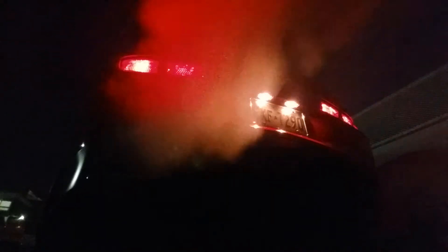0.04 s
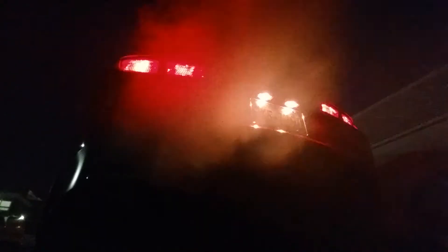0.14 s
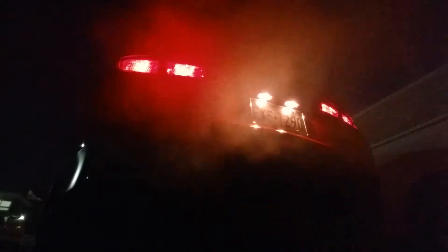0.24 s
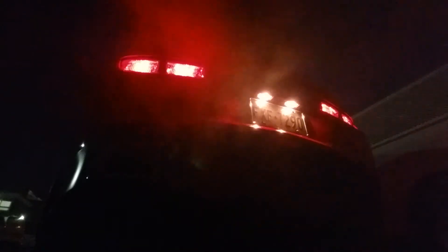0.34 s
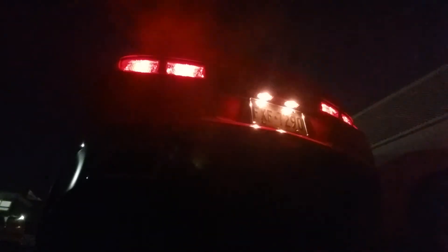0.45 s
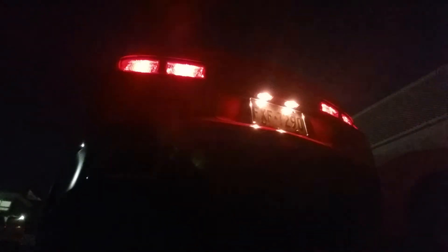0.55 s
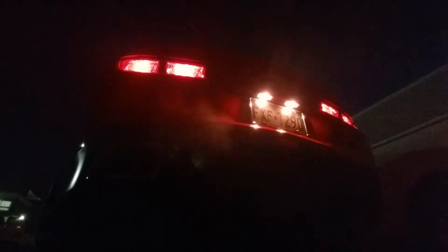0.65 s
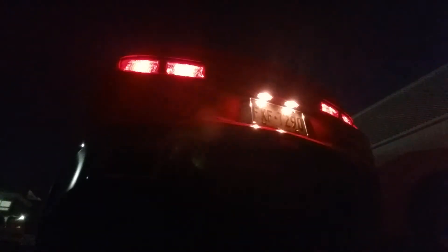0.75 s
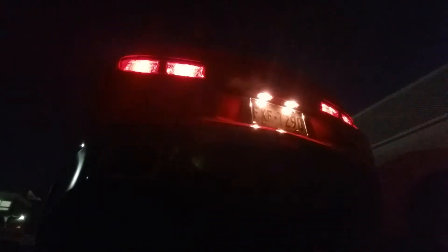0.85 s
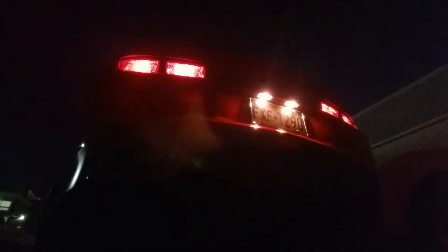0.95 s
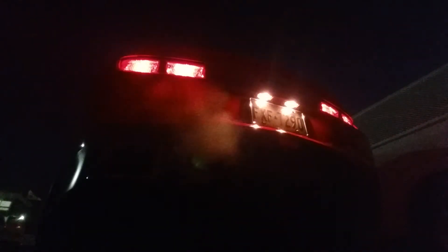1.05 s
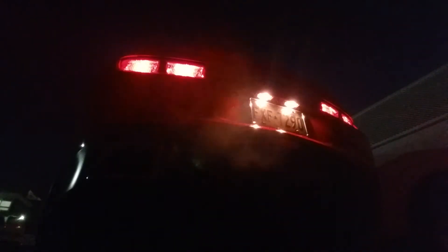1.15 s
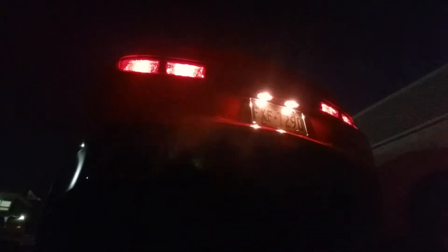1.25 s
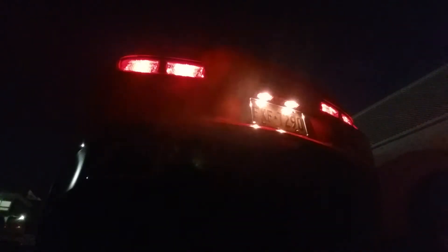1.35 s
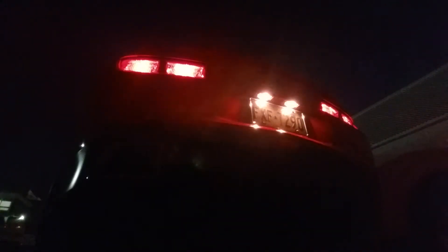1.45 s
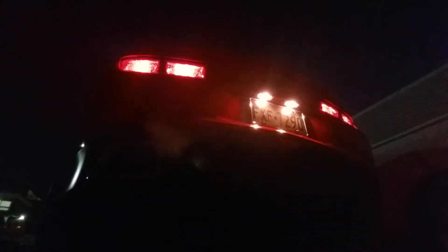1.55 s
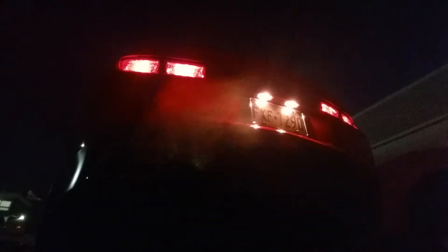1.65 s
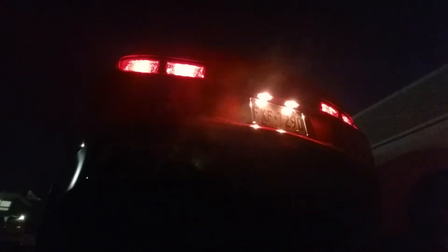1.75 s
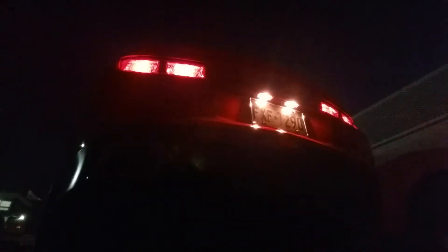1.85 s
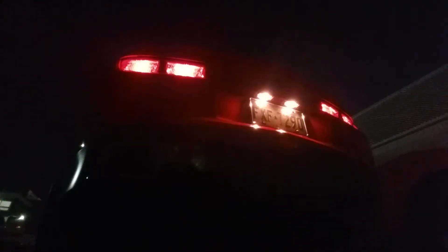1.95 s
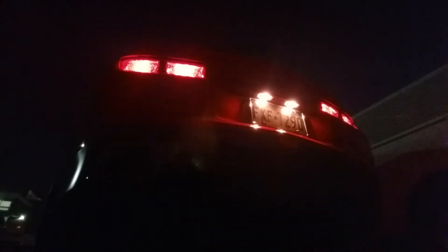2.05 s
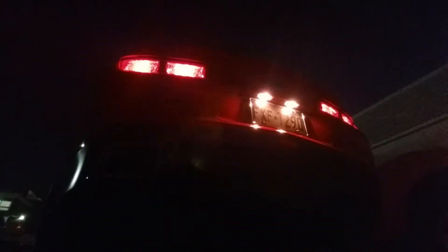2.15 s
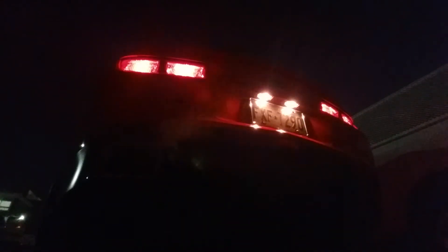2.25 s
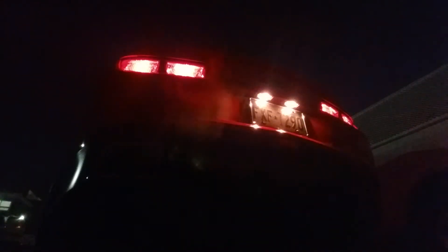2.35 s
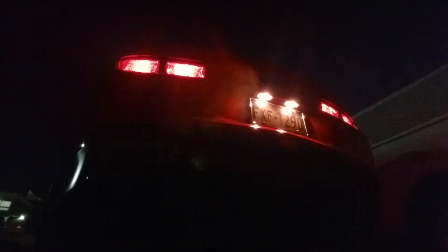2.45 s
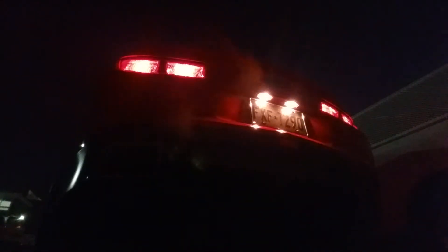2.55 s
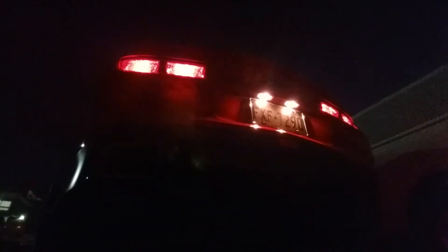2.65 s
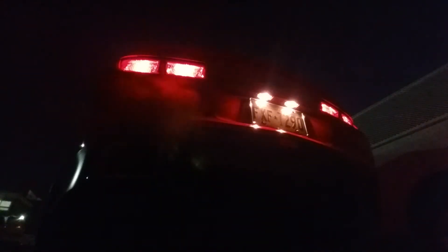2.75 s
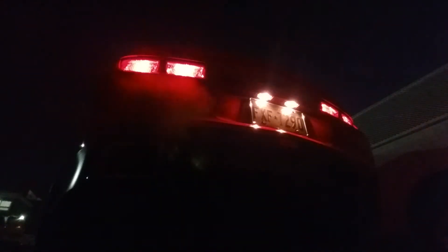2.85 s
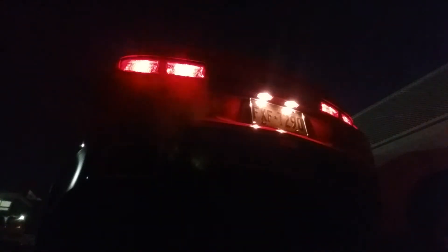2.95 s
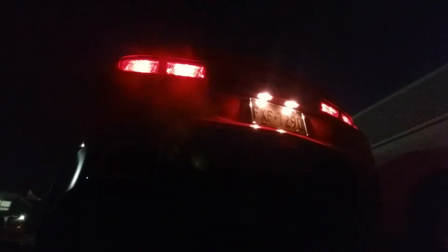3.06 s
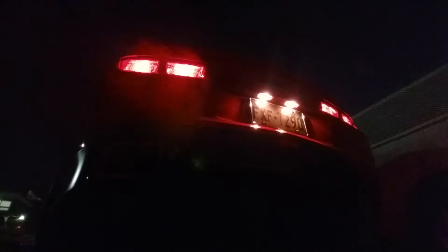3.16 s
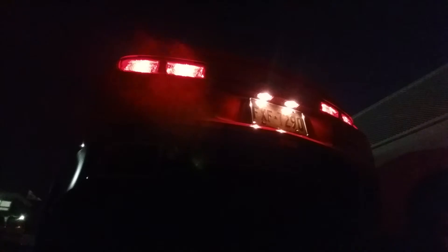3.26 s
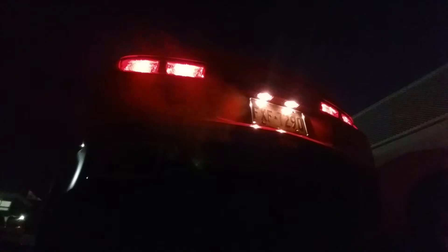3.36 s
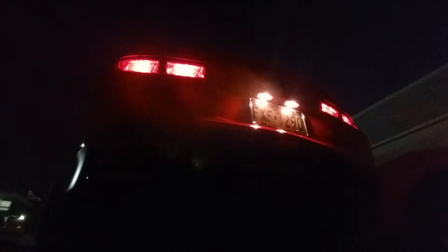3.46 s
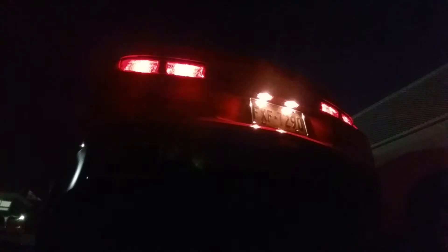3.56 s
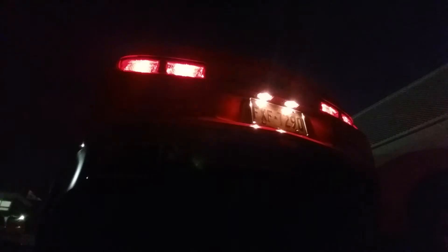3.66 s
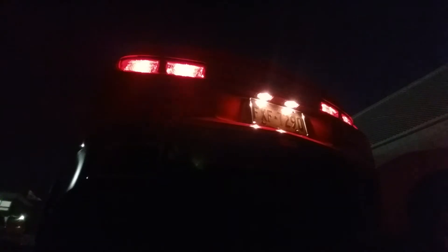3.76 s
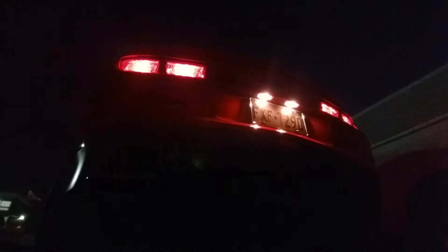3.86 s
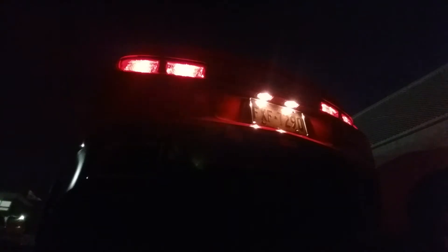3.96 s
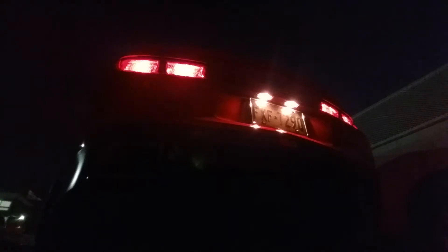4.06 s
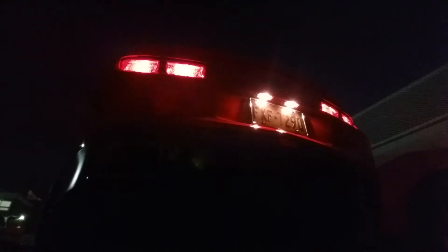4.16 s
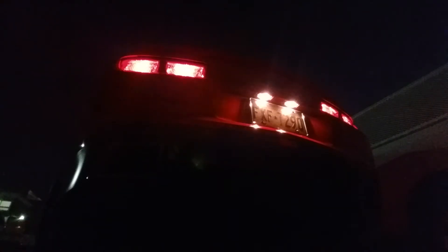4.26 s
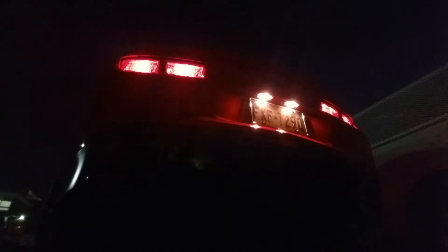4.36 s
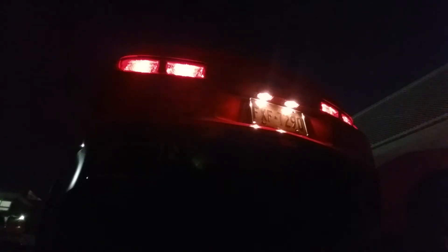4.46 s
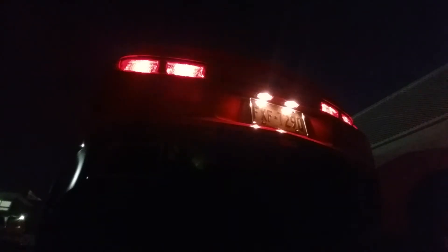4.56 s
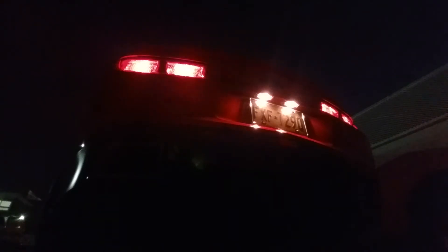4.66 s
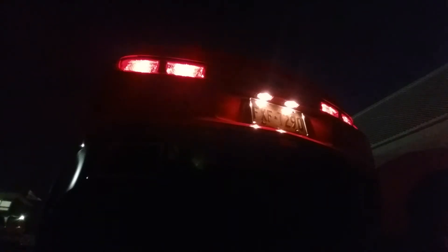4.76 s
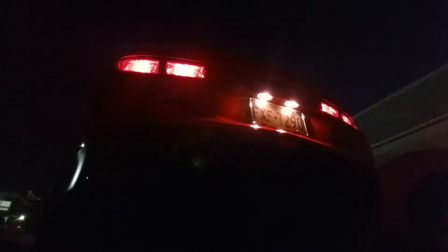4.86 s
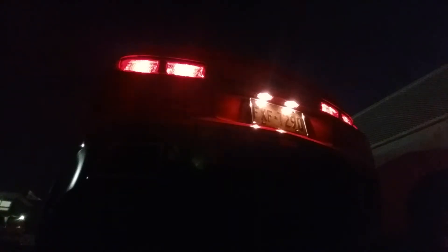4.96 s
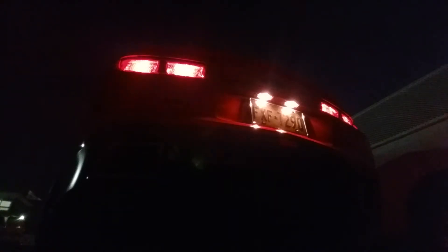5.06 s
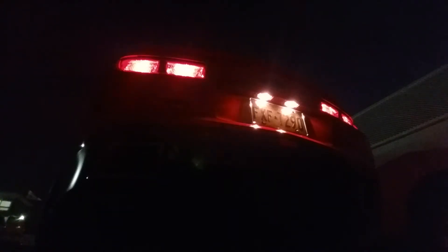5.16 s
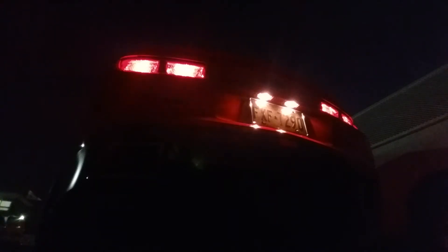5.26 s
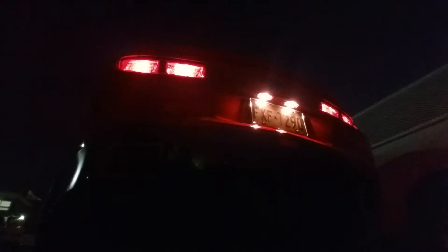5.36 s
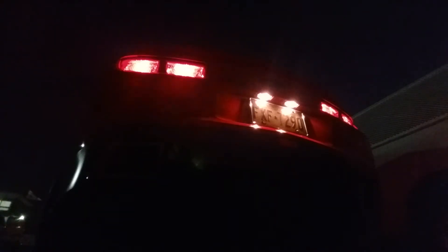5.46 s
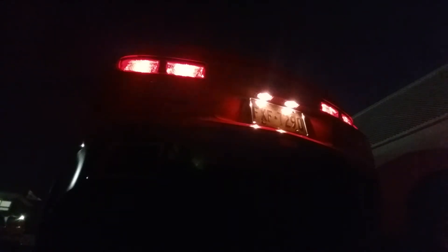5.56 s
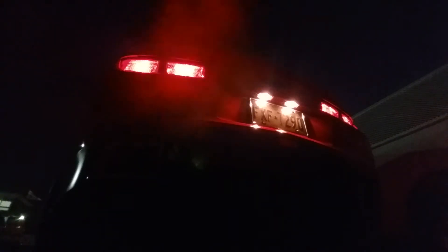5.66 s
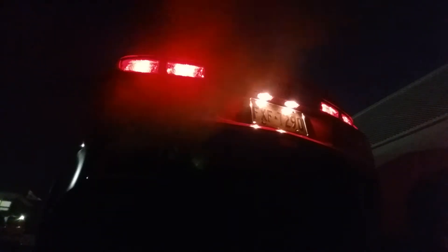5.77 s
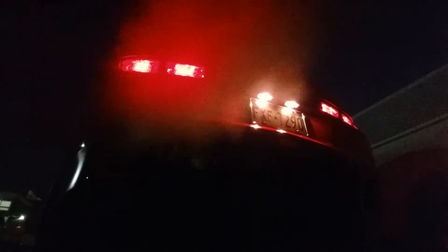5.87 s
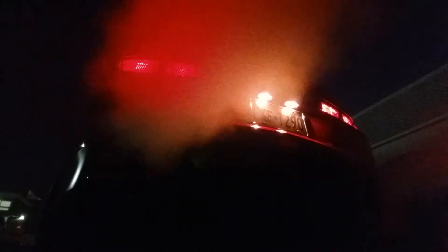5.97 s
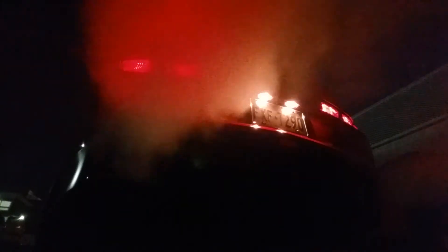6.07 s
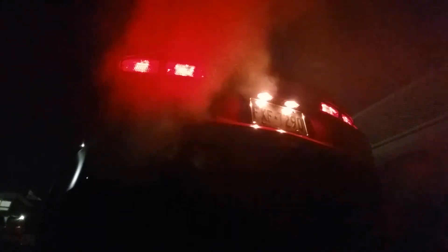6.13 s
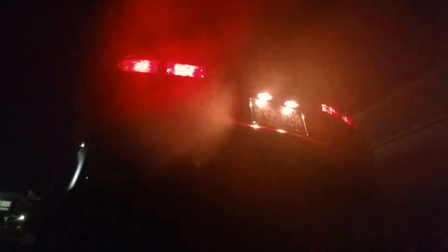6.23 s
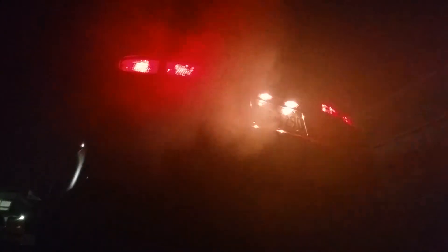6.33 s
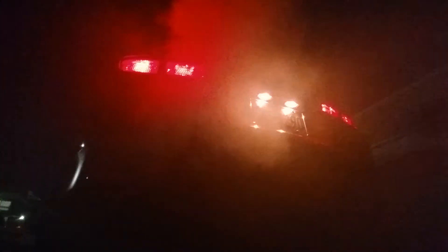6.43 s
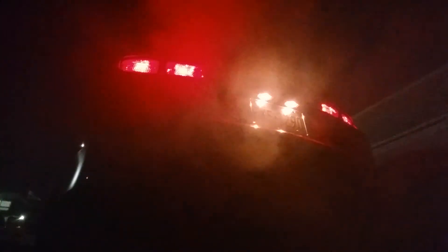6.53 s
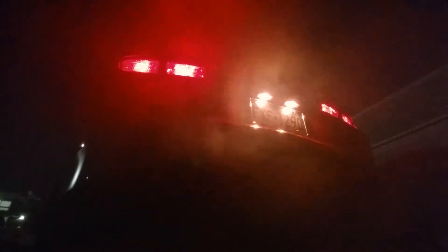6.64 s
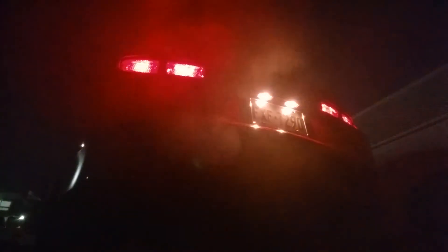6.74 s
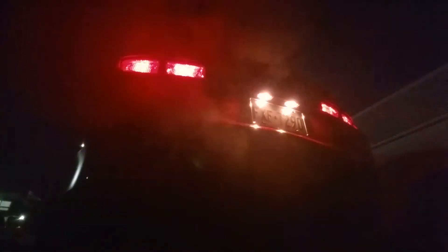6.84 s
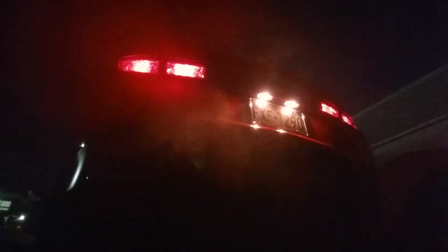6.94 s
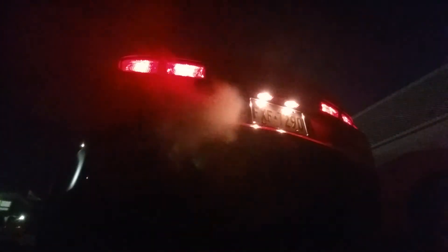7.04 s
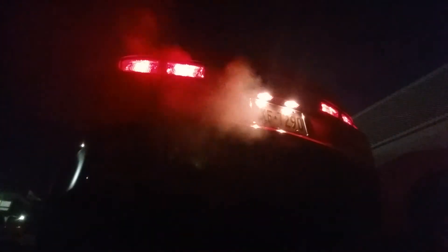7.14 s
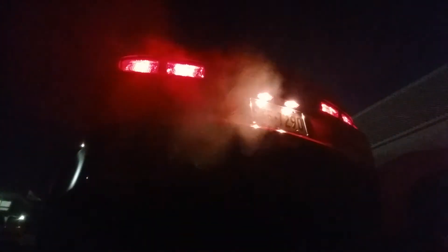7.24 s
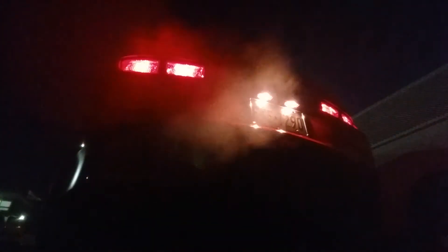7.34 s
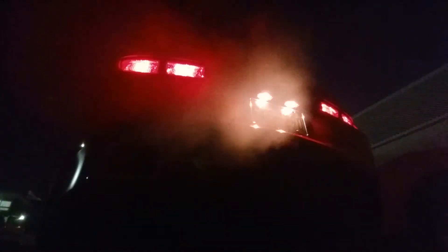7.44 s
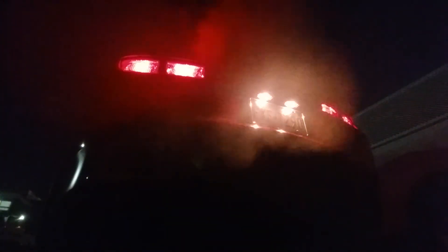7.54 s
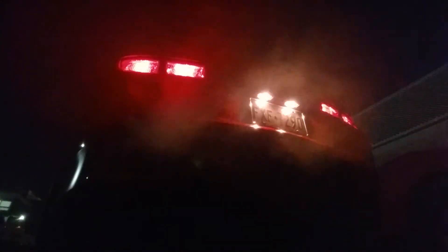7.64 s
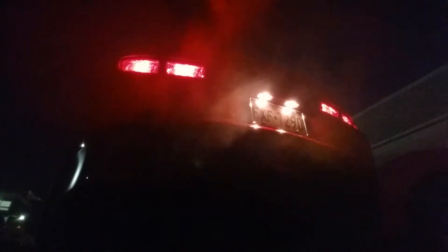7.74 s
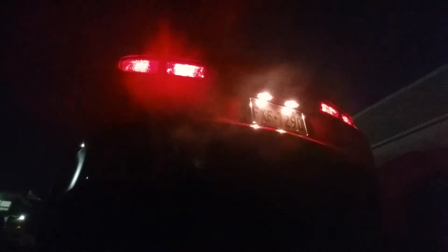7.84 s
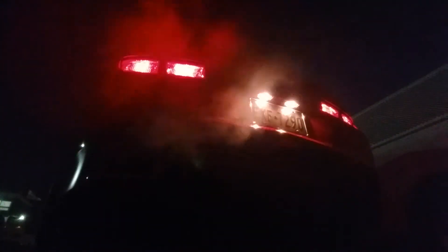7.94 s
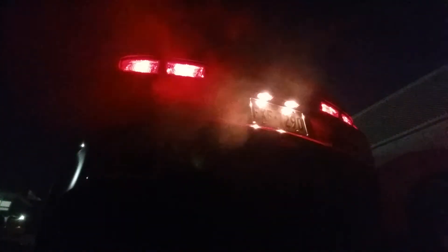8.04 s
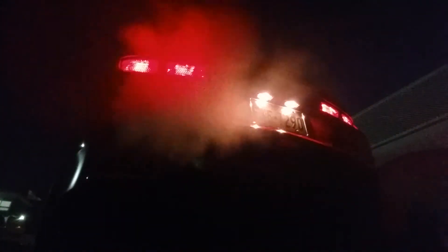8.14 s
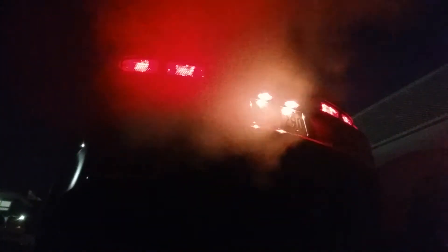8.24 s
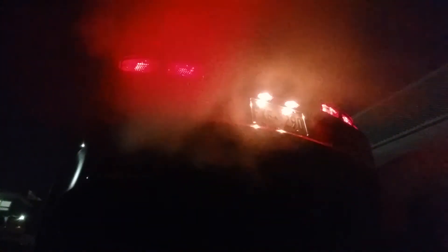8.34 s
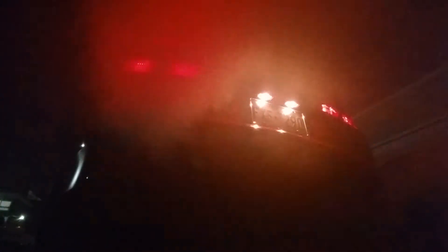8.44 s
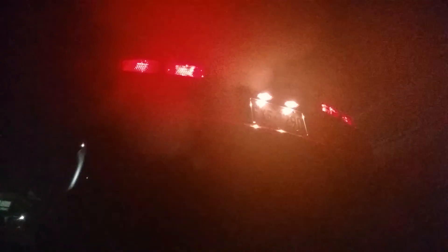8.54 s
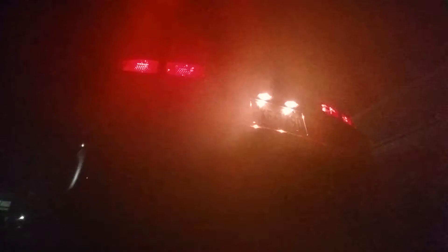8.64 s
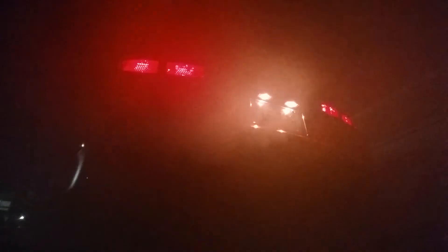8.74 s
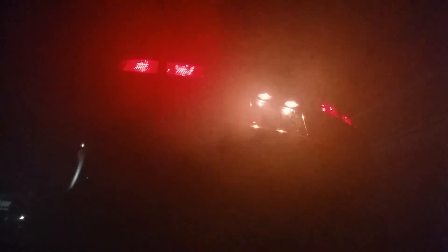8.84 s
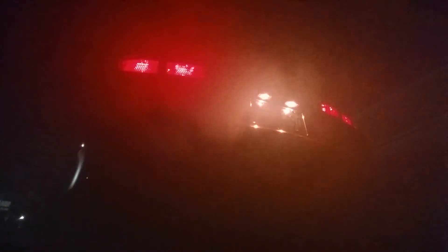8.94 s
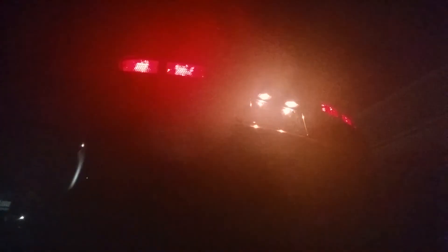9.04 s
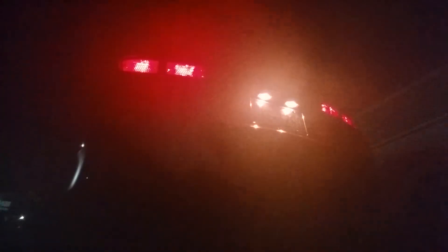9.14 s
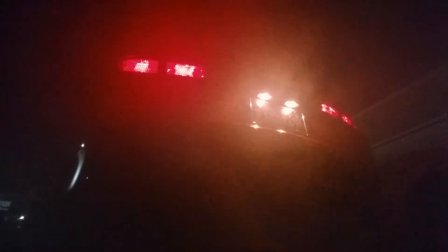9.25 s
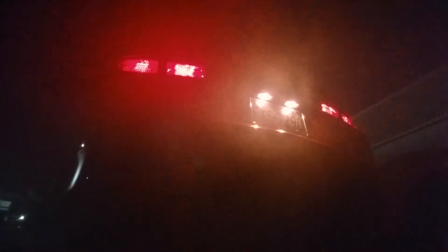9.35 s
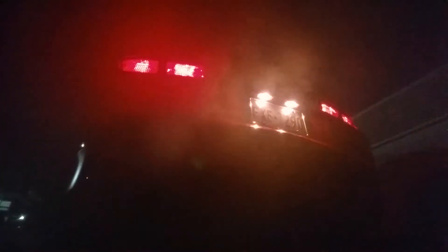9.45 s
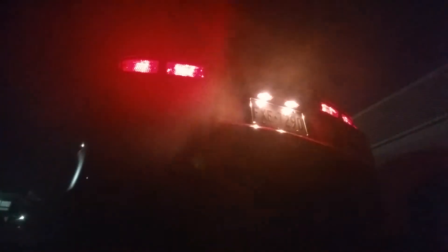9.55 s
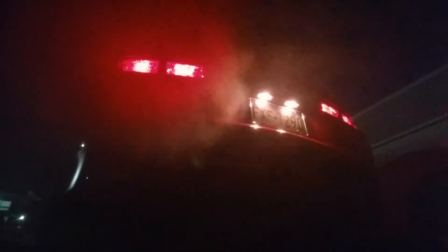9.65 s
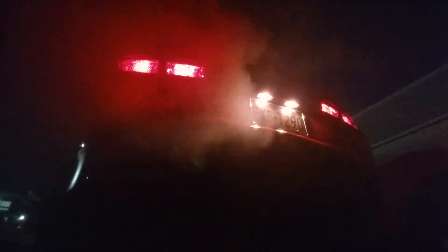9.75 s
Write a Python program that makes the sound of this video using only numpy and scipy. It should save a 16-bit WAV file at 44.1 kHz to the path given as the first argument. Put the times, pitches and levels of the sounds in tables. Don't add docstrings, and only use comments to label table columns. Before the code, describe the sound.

Close behind a car outdoors, a rasping exhaust roar falls into a deep loping idle before two more overloaded revs with crackling afterfire.

```python
import sys
import numpy as np
from scipy import signal
from scipy.io import wavfile
from scipy.ndimage import uniform_filter1d

SR = 44100
rng = np.random.default_rng(int(sys.argv[2]) if len(sys.argv) > 2 else 0)


def invert_db(x):
    u = np.asarray(x, float) / 20
    return 10 ** u


def log_audio(samples):
    frames = np.atleast_2d(samples).T
    limited = np.clip(frames, -1, 1)
    pcm = np.round(limited * 32767).astype(np.int16)
    wavfile.write(sys.argv[1], SR, pcm)


N = 432180


def unit(x, span_s=0.17):
    return x / np.sqrt(uniform_filter1d(x ** 2, int(span_s * SR), mode="reflect") + 1e-12)


def curves(table):
    time_s, *columns = np.transpose(table)
    return [np.interp(np.arange(N) / SR, time_s, column) for column in columns]


def law(x, table):
    return np.interp(x, *np.transpose(table))


def band(x, hz, width_hz):
    return signal.lfilter(*signal.iirpeak(hz, hz / width_hz, fs=SR), x)


def modes(x, table):
    total = 0
    for k, (hz, width_hz, level_db) in enumerate(table):
        pole_width_hz = 1.68 * width_hz
        ring = band(band(x, hz, pole_width_hz), hz, pole_width_hz)
        total = total + (-1) ** k * invert_db(level_db) * ring
    return total


def edge(x, hz, kind, order=2):
    return signal.sosfilt(signal.butter(order, hz, kind, fs=SR, output="sos"), x)


def hiss():
    likeness = -0.27
    a, b = rng.standard_normal((2, N))
    return np.array([a, likeness * a + np.sqrt(1 - likeness ** 2) * b])


def buffet():
    gust = edge(edge(rng.standard_normal((2, N)), 100, "high"), 250, "low")
    _, gas_db = curves(ENGINE)
    return invert_db(-9 + 0.65 * gas_db) * unit(gust)


def scatter_back(x, fade_s, above_hz):
    t = np.arange(4000) / SR
    tails = rng.standard_normal((2, 4000)) * np.exp(-t / fade_s)
    tails /= np.sqrt(np.sum(tails ** 2, axis=1, keepdims=True))
    return signal.oaconvolve(edge(x, above_hz, "high")[None], tails, axes=1)[:, :N]


# start_s, peak_db, treble_db, length_s
POPS = [(1.2416, -23, -58, 0.011), (1.5818, -15, -62, 0.01), (1.6122, -14, -62, 0.004),
        (5.7304, -30, -39, 0.0045), (5.8057, 0, -33, 0.0054), (6.8244, -6, -25, 0.0038),
        (7.0894, -8, -24, 0.027), (7.175, -28, -50, 0.012), (7.3163, -19, -55, 0.016),
        (7.3874, -6.5, -50, 0.0071), (7.4094, -9.5, -44, 0.017), (7.442, -18, -50, 0.023),
        (7.4744, -26, -56, 0.0062), (7.5138, -40, -58, 0.0037), (7.5822, -27, -60, .006),
        (7.6041, -13, -54, .008), (7.6465, -7, -31, 0.037), (7.7408, -19, -58, 0.0073),
        (7.7837, -36, -62, 0.0046), (7.8471, -20.5, -51, 0.011), (7.9544, -30, -54, .003),
        (8.2043, -11, -54, 0.014), (8.2894, -13, -34, 0.014), (8.3394, -0.5, -21, 0.011),
        (9.5594, -29, -42, .008), (9.6425, -20, -46, 0.011), (9.677, -18, -64, 0.018)]
# first_s, last_s, first_db, last_db, treble_db
POP_RUNS = [
    (.540, .75, -12, -12, -29),
    (.808, .96, -12, -12, -30),
    (1.002, 1.39, -14, -17, -54),
    (5.855, 5.99, -10, -8, -29),
    (6.896, 7.04, -12, -11, -29),
    (9.351, 9.5, -10, -13, -29),
]


def pop_list():
    firing_hz, = curves(SPEED)
    cycle = np.cumsum(firing_hz) / SR / 8
    rows = list(POPS)
    for first_s, last_s, first_db, last_db, treble_db in POP_RUNS:
        start, end = cycle[int(first_s * SR)], cycle[int(last_s * SR)]
        for start_s in np.searchsorted(cycle, np.arange(start, end)) / SR:
            peak_db = np.interp(start_s, [first_s, last_s], [first_db, last_db])
            rows.append((start_s, peak_db, treble_db, 0.01))
    return rows


def pops():
    crack, sizzle = np.zeros(N), np.zeros(N)
    t = np.arange(3000) / SR
    for start_s, peak_db, treble_db, length_s in pop_list():
        i = int(start_s * SR)
        shape = (1 - np.exp(-t / 0.0026)) * np.exp(-(t / length_s) ** 2)
        crack[i:i + 3000] += invert_db(peak_db) * shape
        sizzle[i:i + 3000] += invert_db(treble_db) * shape
    ring = modes(crack * rng.standard_normal(N), LOW_PIPES + HIGH_PIPES)
    snap = edge(edge(crack * hiss(), 1000, "high"), 3000, "low", order=4)
    return invert_db(30) * ring, invert_db(2.5) * snap + edge(sizzle * hiss(), 4600, "high")


def firings(firing_hz):
    turn = np.cumsum(firing_hz) / SR
    turn -= turn[int(4.358 * SR)]
    count = np.floor(turn).astype(int)
    at = np.flatnonzero(np.diff(count)) + 1
    return at, count[at] % 8, rng.standard_normal((N // 100, 3))[:len(at)].T


def train(at, size):
    out = np.zeros(N)
    np.add.at(out, np.clip(at, 0, N - 1).astype(int), size)
    return out


def puffs(clicks, fade_s):
    return signal.lfilter([1], [1, -np.exp(-1 / (fade_s * SR))], clicks)


NEAR_DB = [0, -12, -1, -5, -12, -1, -10, -20]
FAR_DB = [-10, -3, -14, -14, -7, -14, 0, -5]
# centre_hz, width_hz, level_db
NEAR_TIP = [(3310, 320, 7.5), (4130, 270, -23), (5680, 740, -3.5), (6260, 2900, -20.5), (9980, 860, -15.5),
            (12600, 3600, -23)]
FAR_TIP = [(1403, 353, 11), (2390, 820, 3.5)]


def spit(at, level_db, tip, fade_s, steady):
    gusts = unit(puffs(train(at, invert_db(level_db)), fade_s)) + steady
    return modes(gusts * hiss(), tip)


def gas_spit(late, cylinder, chance, speed):
    near = spit(late, np.array(NEAR_DB)[cylinder] + 2.5 * chance[1], NEAR_TIP, .012, .45)
    far = spit(late, np.array(FAR_DB)[cylinder] + 3.0 * chance[0], FAR_TIP, .011, .5)
    jet = invert_db(-10.5) * speed ** 3 * edge(hiss(), 8500, "high")
    return unit(near + far) + jet


BARK_DB = [4, -1, 0, -1, 2, 2, -4, -3]
# centre_hz, width_hz, level_db
LOW_PIPES = [(240, 24, -13), (305, 40, -15), (370, 32, 0), (435, 45, -17), (512, 36, -7)]
HIGH_PIPES = [(574, 47, -8.5), (661, 168, -14), (744, 51.7, -6.5), (872, 102, -9.5)]
ROAR = [(519, 248, -5), (1040, 67, -14)]


def pipe_tone(at, late, cylinder, imbalance, scatter, speed, gas_db):
    sharp = invert_db(np.array(BARK_DB)[cylinder] + 9.8 * scatter[1])
    bark = unit(train(late, (1 - .75 * speed[at]) * sharp + .5 * speed[at] * imbalance))
    flow = unit(puffs(train(late, sharp), 0.025)) + .8 + 3 * speed
    rush = (.3 + 2.2 * speed) * bark + unit(flow * rng.standard_normal(N))
    crisp = rush + .45 * bark
    opening = invert_db(9 + 0.37 * gas_db)
    pipe = modes(rush, LOW_PIPES) + opening * modes(crisp, HIGH_PIPES)
    roar = opening * speed ** 2 * modes(rush, ROAR)
    return unit(edge(pipe, 1012, "low", order=8) + roar)


# centre_hz, width_hz, level_db
SILENCER = [(55, 20, 2), (98, 12, 3)]
MID_PIPE = [(138.3, 31, -8)]
CROSSOVER = [(87, 16, 0), (163, 16, -9)]


def silencer_boom(arrive, imbalance, scatter, rough, firing_hz):
    push = unit(train(arrive, invert_db(8 * scatter[0])))
    push = push + 1.3 * rough * rng.standard_normal(N)
    lift = invert_db(13.5 * np.clip(firing_hz / 60 - 1, 0, 1))
    even = unit(modes(push, SILENCER) + lift * modes(push, MID_PIPE))
    lope = unit(modes(train(arrive, imbalance), CROSSOVER))
    lope_gain = .75 * np.minimum(52 / firing_hz, 1) ** 1.5 + 2 * rough ** 2
    return unit(even + lope_gain * lope)


# time_s, exhaust_pressure_db, gas_flow_db
ENGINE = [(0, 1, -12), (.5, 0.5, -15), (.95, -4, -37), (1.4, -13.5, -38.5), (1.75, -17.5, -44.5),
          (2.7, -21.5, -50), (3.4, -20, -38), (5.68, -17.5, -34), (5.9, 0.5, -19.5), (6.05, -2, -8),
          (6.8, -0.5, -16), (7.3, -4.5, -40.5), (7.75, -16, -36), (8.17, -13.5, -50), (8.26, -2.5, -19.5),
          (8.5, -3.5, -9.5), (9.2, -2, -12.5), (9.8, -6, -41.5)]
# time_s, firing_rate_hz
SPEED = [(0, 275), (.9, 178), (1.9, 90.2), (2.38, 70), (2.86, 61), (3.9, 50.1), (4.6, 51.4), (5.05, 49.5),
         (5.69, 49.6), (5.92, 138), (6.1, 260), (6.25, 288), (7.95, 98), (8.1, 102), (8.25, 135),
         (8.58, 320), (8.9, 300), (9.8, 148)]
# firing_rate_hz, silencer_boom_db
BOOM_LAW = [(50, -9.5), (66, -16), (95, -16), (140, -12), (200, -12.5), (260, -24.5), (320, -32)]
# firing_rate_hz, roughness (0-1)
ROUGH_LAW = [(55, .09), (90, .3), (140, .52), (220, .32)]
IMBALANCE = [1, .8, -.35, -4.4, -.5, 2.9, -1.2, 1.75]


def engine():
    firing_hz, = curves(SPEED)
    pipe_db, gas_db = curves(ENGINE)
    speed = np.clip(firing_hz / 250, 0, 1)
    gain_hz_per_s = np.gradient(uniform_filter1d(firing_hz, int(.06 * SR))) * SR
    pull = np.clip(gain_hz_per_s / 380, 0, 1)
    boom_db = law(firing_hz, BOOM_LAW) + 9 * pull * np.clip((149 - firing_hz) / 40, 0, 1)
    rough = law(firing_hz, ROUGH_LAW) * (1 - .6 * pull)
    at, cylinder, chance = firings(firing_hz)
    scatter = rough[at] * chance
    late = at + .5 * rough[at] * scatter[2] * SR / firing_hz[at]
    arrive = late + .0072 * SR
    imbalance = np.array(IMBALANCE)[cylinder] * (1 + .9 * scatter[1])
    boom = silencer_boom(arrive, imbalance, scatter, rough, firing_hz)
    pipe = pipe_tone(at, late, cylinder, imbalance, scatter, speed, gas_db)
    gas = gas_spit(late, cylinder, chance, speed)
    return invert_db(boom_db) * boom, invert_db(pipe_db) * pipe, invert_db(gas_db) * gas


def scene():
    boom, pipe, gas = engine()
    ring, crackle = pops()
    pipe = pipe + ring
    pipe = pipe + .7 * band(pipe, 772, 110) + .3 * band(pipe, 522, 72)
    pipe = pipe - .5 * band(pipe, 830, 120) - .3 * band(pipe, 690, 60) + .4 * band(pipe, 570, 110)
    near = pipe + .35 * band(pipe, 685, 720)
    far = pipe - 1.5 * band(pipe, 920, 520)
    blur = scatter_back(pipe, fade_s=.004, above_hz=449)
    bright = gas + crackle
    bright[0] += .5 * band(bright[0], 610, 560)
    boom = boom * invert_db([[-.4], [.4]])
    return boom + np.array([near, far]) + invert_db(-2) * blur + bright + buffet()


def roll_off(x):
    return signal.sosfilt(signal.butter(12, 16750, fs=SR, output="sos"), x)


# start_s, end_s, depth (0-1)
DUCKS = [
    (0, 0.846, 0),
    (5.954, 6.205, 0.07),
    (6.215, 7.14, 0),
    (8.486, 9.191, 0.97),
    (9.194, 9.66, 0.3),
]


def record(dry):
    t = np.arange(N) / SR
    depths = sum(depth * ((t > start_s) & (t <= end_s)) for start_s, end_s, depth in DUCKS)
    duck = uniform_filter1d(depths, int(0.035 * SR))
    ceiling = invert_db(-1.7 - 1.5 * duck)
    knee = 3
    x = dry / (1 + np.abs(dry / ceiling) ** knee) ** (1 / knee)
    bass_gain = invert_db(np.minimum(-23.5 * duck, 0))
    x = x - (1 - bass_gain) * edge(x, 370, "low", order=1)
    x = x + 1.8 * band(x, 13500, 7000)
    x = edge(x, 45, "high")
    x = x / (1 + np.abs(x) ** 8) ** (1 / 8)
    x = signal.sosfilt(signal.ellip(10, .2, 70, 15900, fs=SR, output="sos"), x)
    x = np.clip(1.05 * x, -1, 1)
    return roll_off(x)


dry = scene()
out = record(dry)
log_audio(out)
```